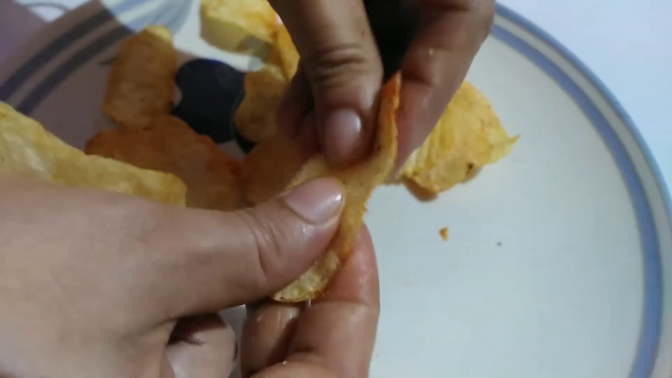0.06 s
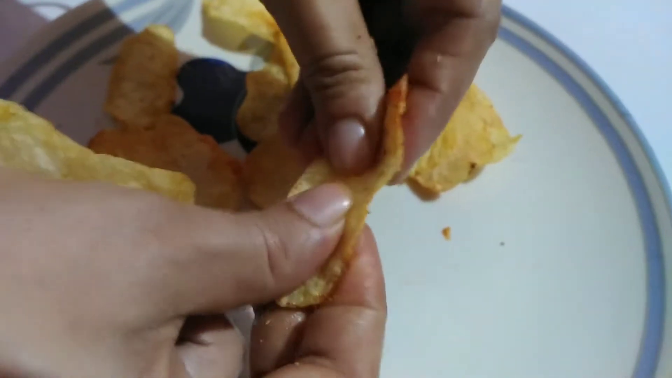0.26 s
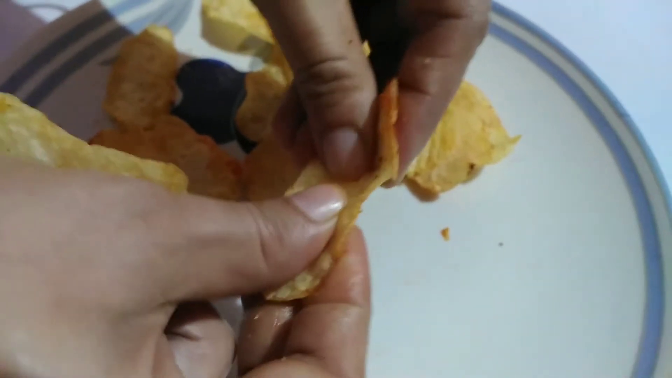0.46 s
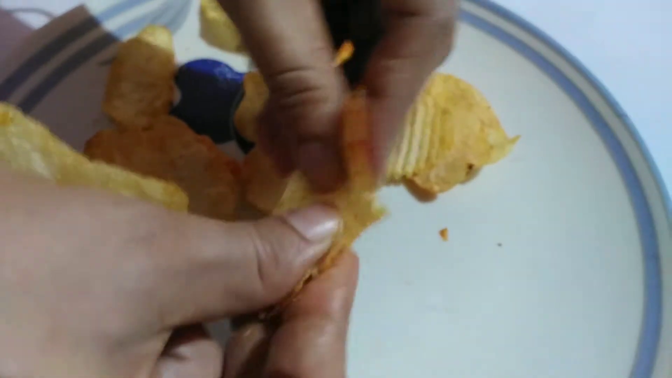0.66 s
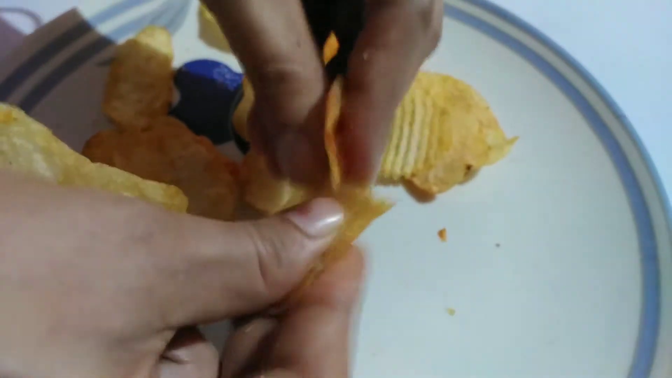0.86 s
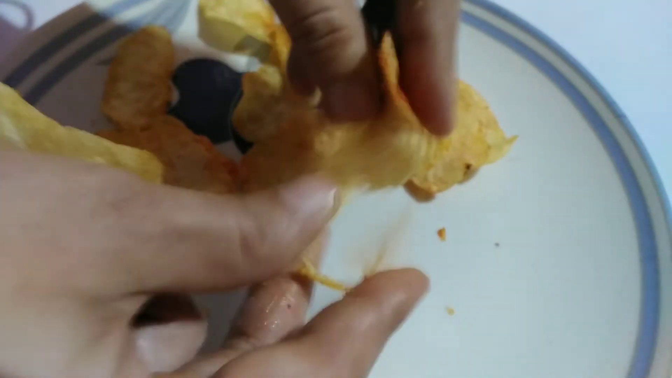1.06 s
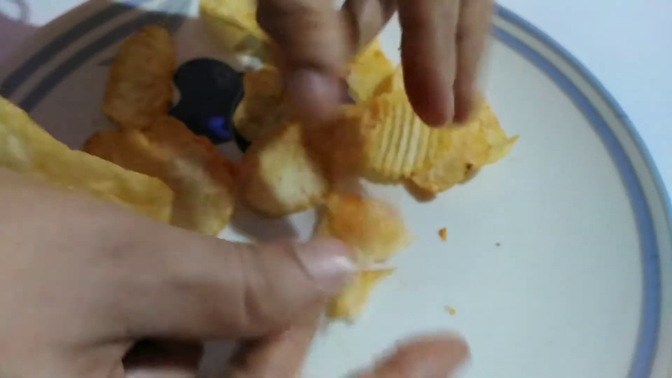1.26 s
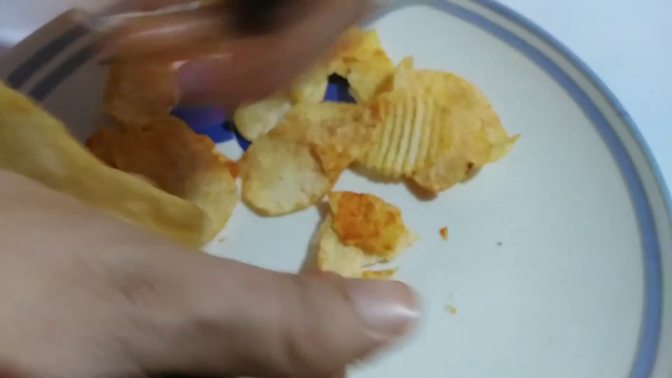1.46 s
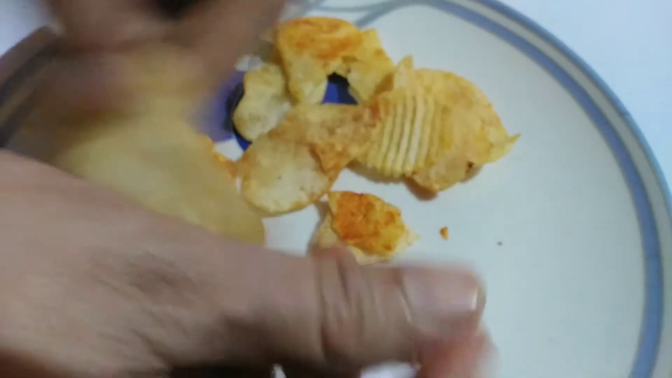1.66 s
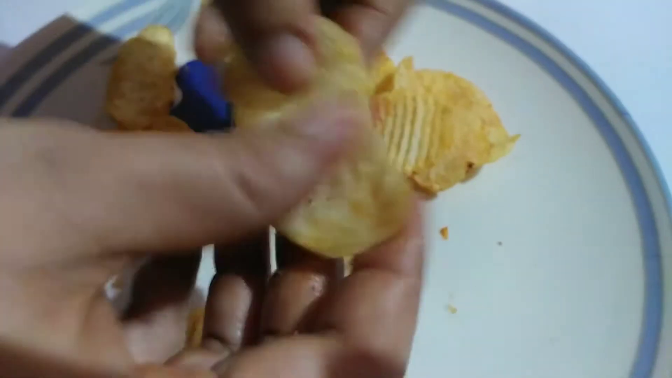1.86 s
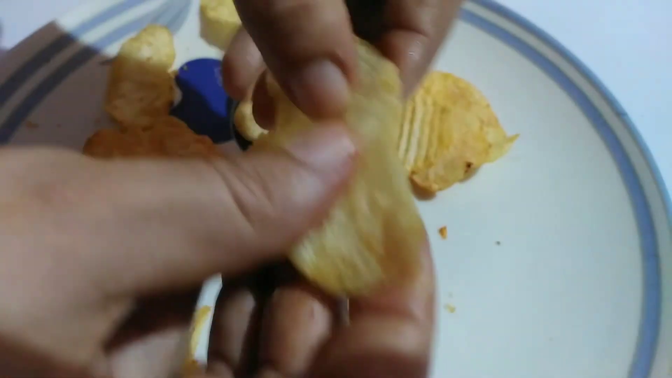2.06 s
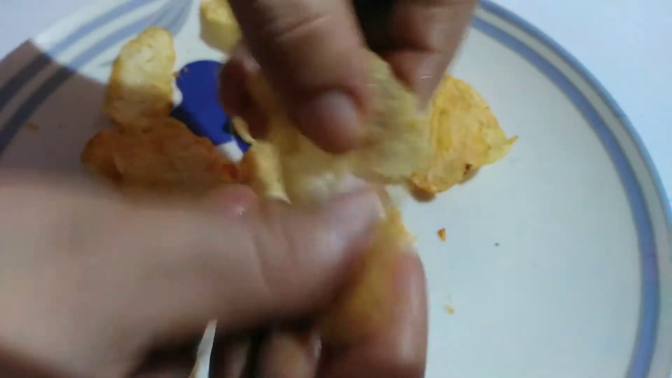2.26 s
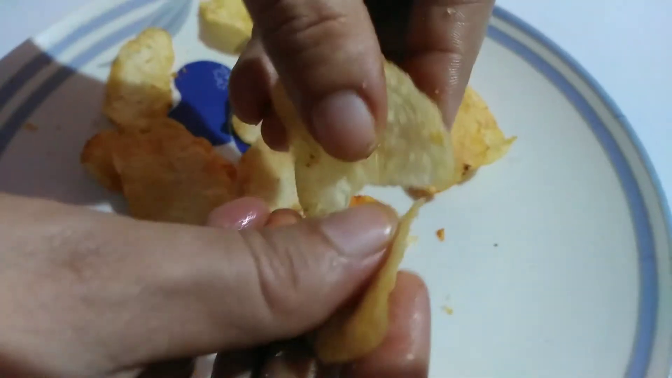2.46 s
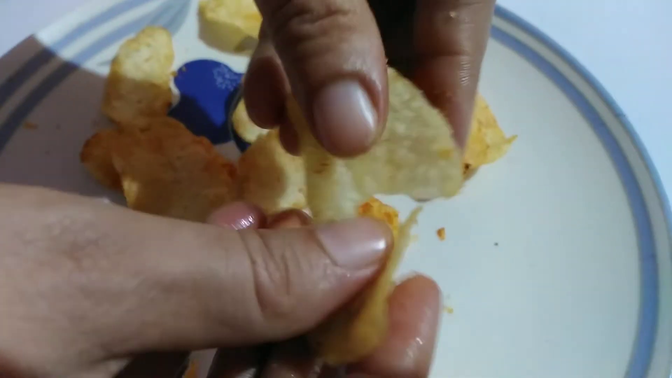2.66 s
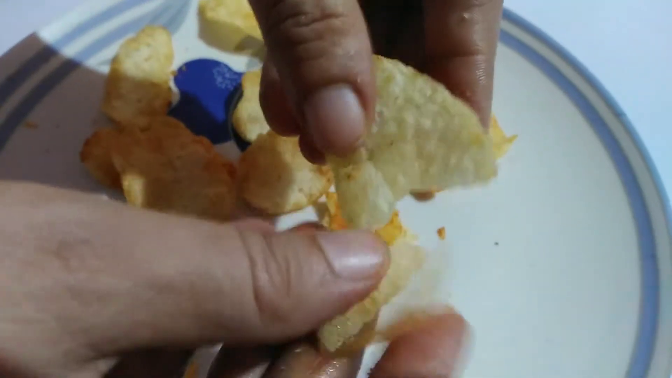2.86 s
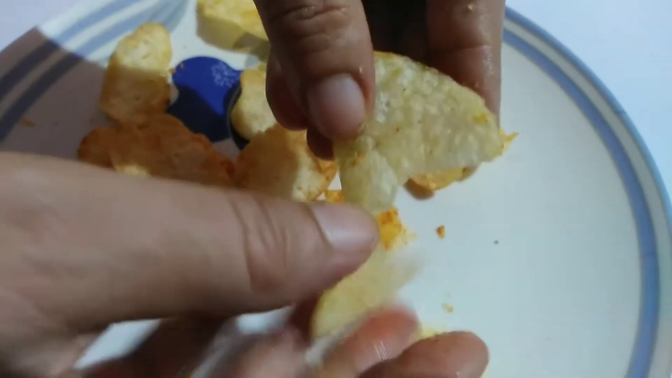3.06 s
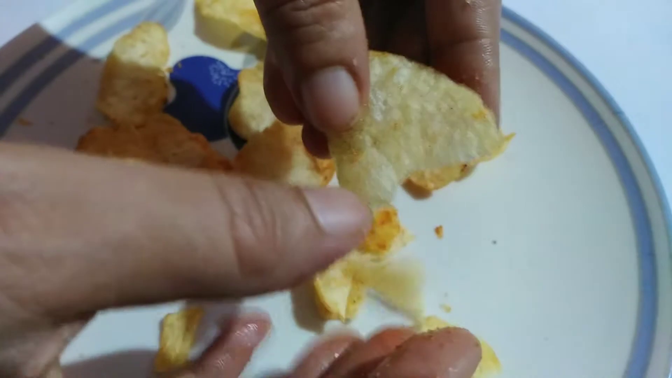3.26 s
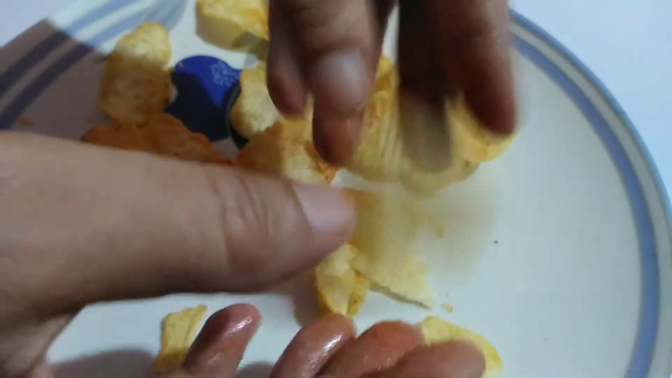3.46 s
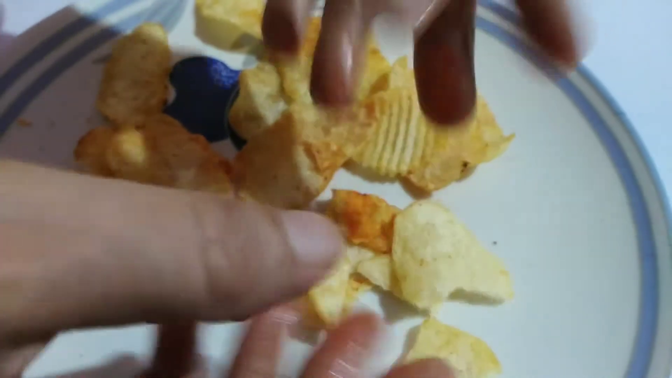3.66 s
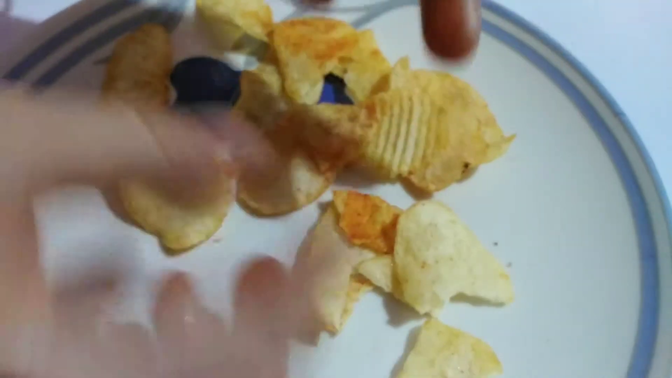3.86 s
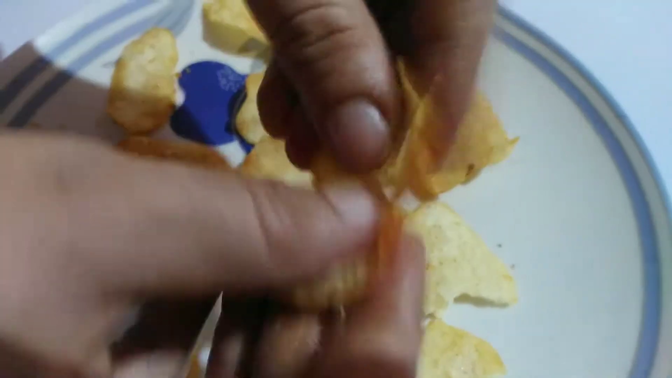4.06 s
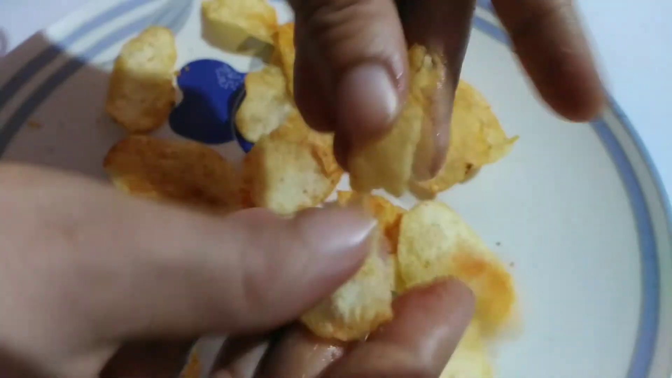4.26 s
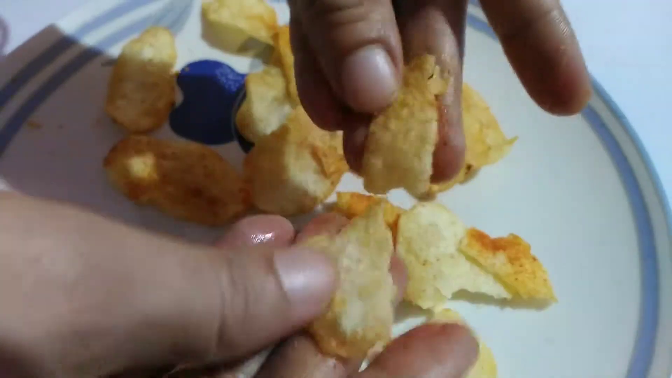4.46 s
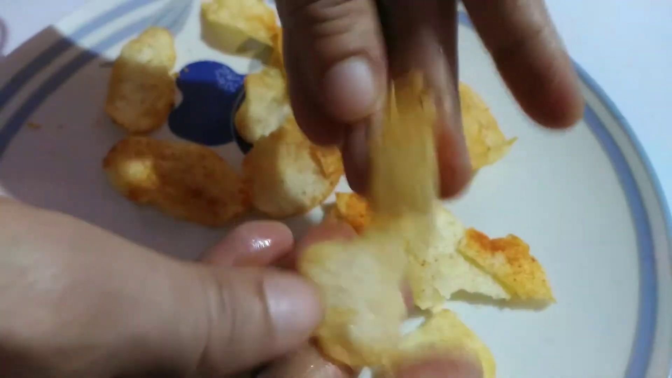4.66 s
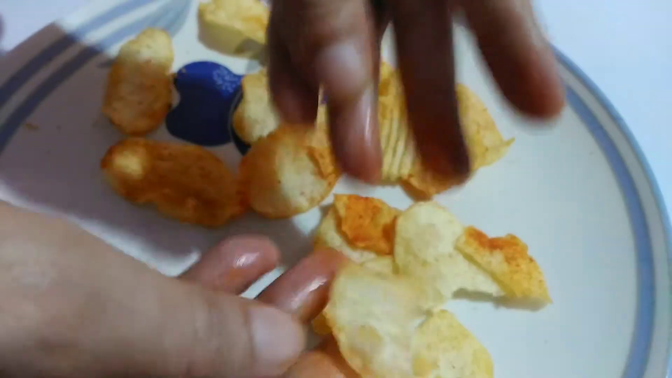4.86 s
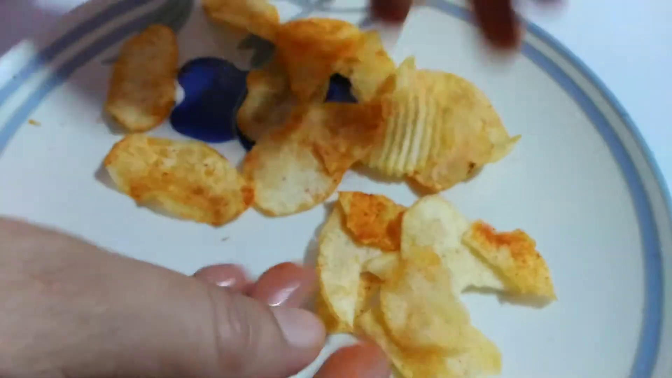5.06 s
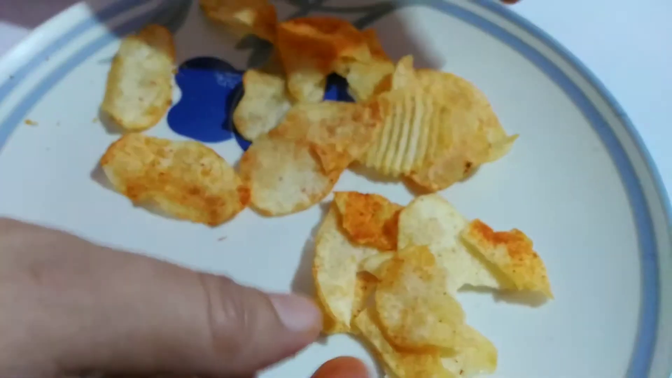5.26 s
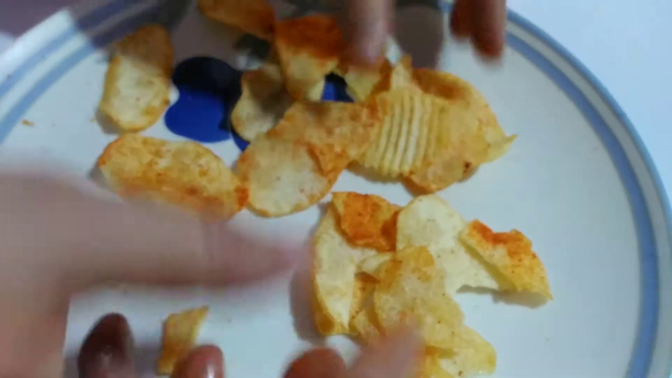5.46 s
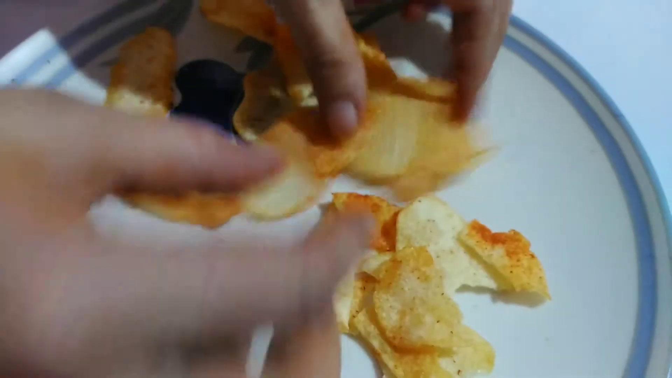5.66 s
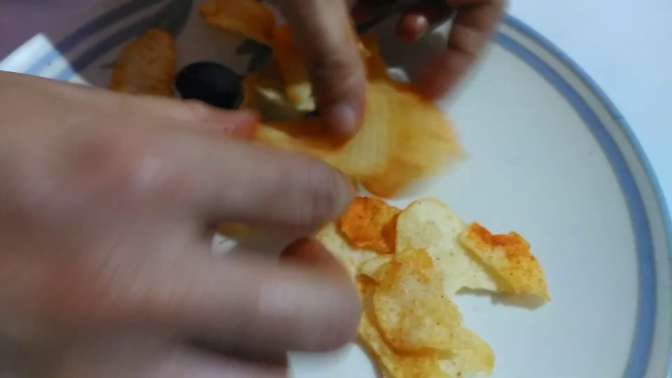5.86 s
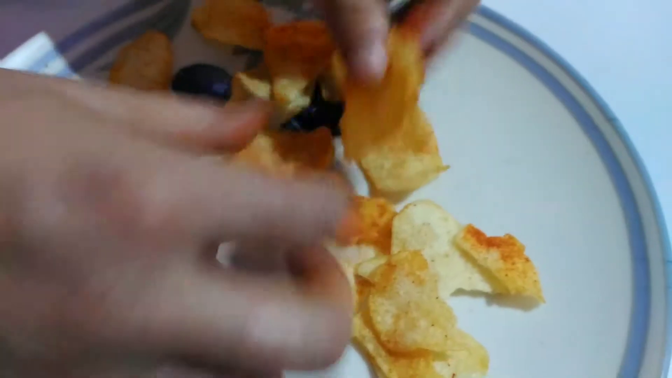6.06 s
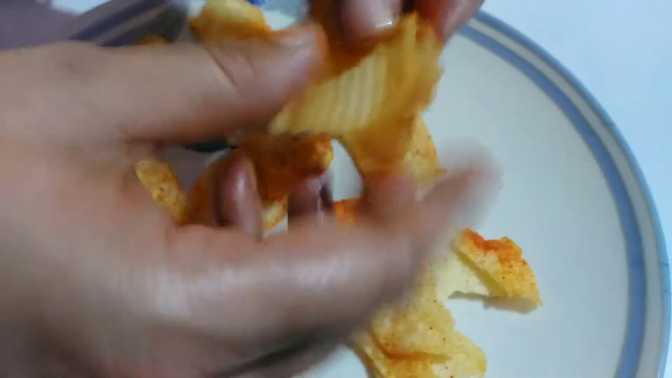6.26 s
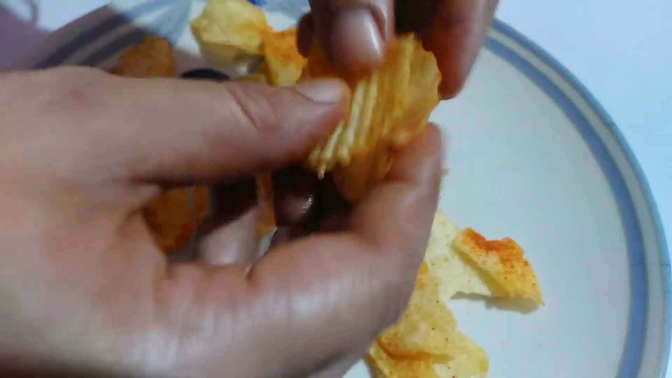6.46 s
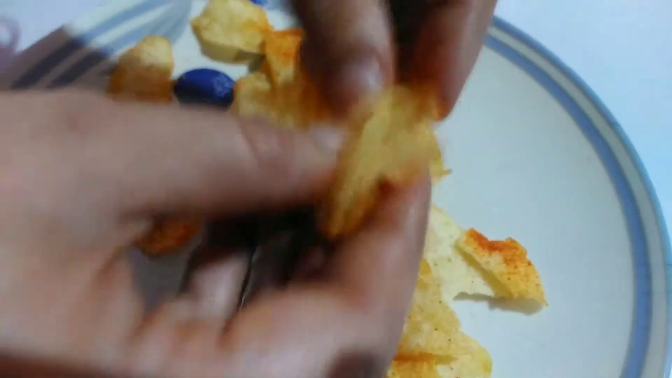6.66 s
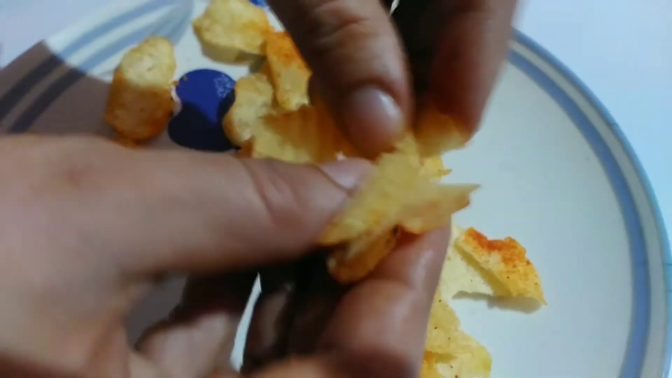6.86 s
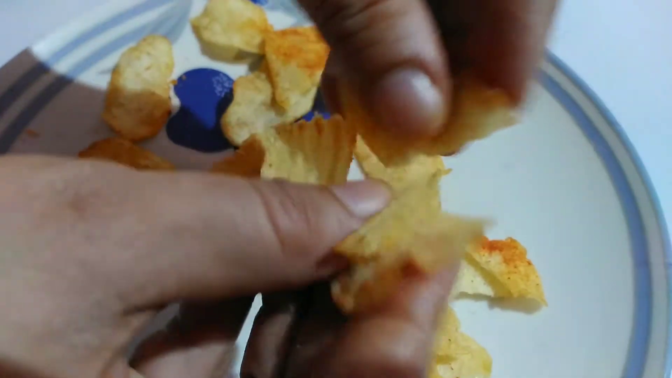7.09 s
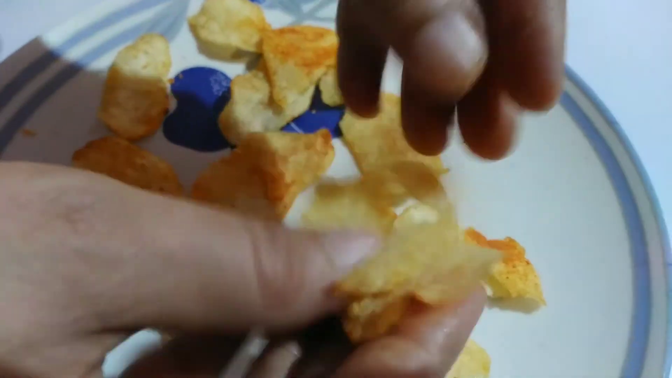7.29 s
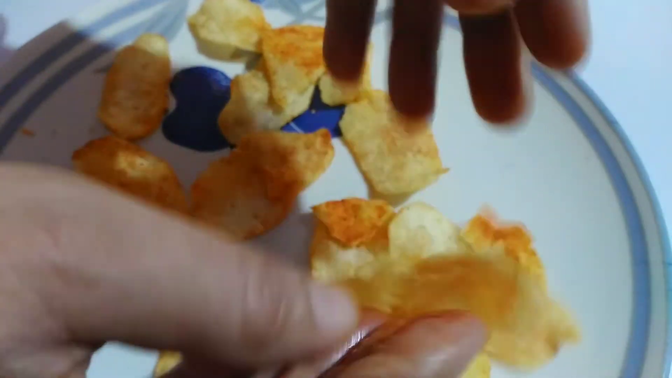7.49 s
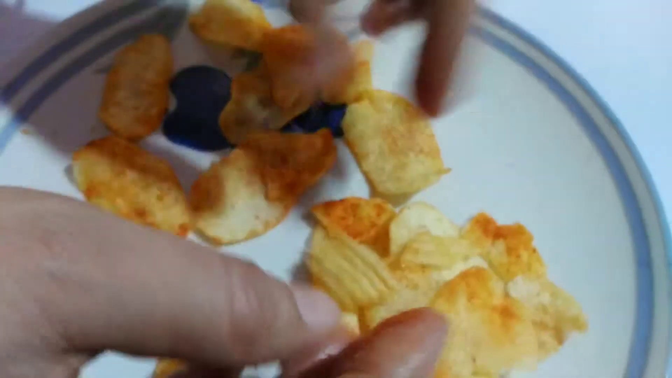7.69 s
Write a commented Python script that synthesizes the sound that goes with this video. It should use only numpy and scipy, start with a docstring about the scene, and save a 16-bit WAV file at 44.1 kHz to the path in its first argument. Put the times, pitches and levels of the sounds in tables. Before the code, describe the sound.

Very close stereo pickup of crisp chips being broken by hand over a plate in a small room. A dense crackle of dry snaps opens, then pieces drop with duller clicks. A very loud double snap follows at about two seconds, then scattered drops and rustles, handling, two more hard snaps and a final crumbly patter. Faint low appliance hum and soft air noise stay behind.

```python
"""Crisp fried chips are snapped by hand and dropped on a plate, close to a two-port phone in a small room.
Every crack is a burst of tiny fractures ringing the thin flake. Crumbs and fingers rustle as coloured
noise with grains, strewn with small chance cracks. The room answers with a short tail of dying noise bands.
Low sine bumps come through the table and faint tones from further off, over an appliance hum of tones
and narrow noise bands and a soft air noise."""
import sys
import numpy as np
from scipy import signal
from scipy.fft import rfft, irfft, next_fast_len
from scipy.io import wavfile
from scipy.ndimage import uniform_filter1d

SR = 44100
rng = np.random.default_rng(int(sys.argv[2]) if len(sys.argv) > 2 else 0)


def persist_wave(psi):
    """Save psi, clipped to +-1, as 16-bit WAV."""
    counts = np.round(np.clip(psi, -1, 1) * 32767).astype(np.int16)
    wavfile.write(sys.argv[1], SR, np.atleast_2d(counts).T)


N = 340848

# crumbs and fingers rustling: [peak t/s, level before colouring/dB, rise over 20 dB/s, fall over 20 dB/s,
# brightness/dB]; a negative fall cuts the hiss off before its peak, or leaves only the chance cracks
RUSTLES = [(0, -57, 0.0037, -0.41, -2), (.14, -54, .005, -0.44, 2.5), (0.461, -55.5, 0.003, 0.4, 9),
           (.575, -54.5, 0.0054, -0.15, -5), (0.902, -68.5, .12, .1, 6.5), (1.0, -62, .08, -0.04, 10.5),
           (1.155, -33.5, 0.0083, 0.05, -5), (1.308, -48, 0.13, 0.1, -8.5), (1.4, -56, .05, -0.08, 16.5),
           (2.196, -38.5, .01, 0.087, -4.5), (2.26, -48, .05, -0.08, 1.5), (3.05, -59.5, .03, 0.33, 3),
           (3.2, -56, .1, 0.15, -4.5), (4.265, -49.5, 0.0079, 0.22, 0.5),
           (4.76, -51.5, 0.0055, -0.24, -6.5), (5.02, -56.5, .04, 0.1, -3), (5.092, -47, .05, -0.0049, -3),
           (5.645, -54.5, 0.012, 0.34, -5), (5.697, -44.5, 0.027, -0.01, -6),
           (5.749, -43.5, .02, -0.0722, -15), (5.78, -54, 0.018, 0.28, 1.5),
           (5.877, -44, .05, 0.1562, -6.5), (6.015, -49.5, .15, 0.09, -1.5),
           (6.581, -37, 0.0055, 0.0735, 5), (6.69, -47.5, .05, 0.17, 10), (6.9, -72, .1, -0.1, 10),
           (7.24, -55.5, .03, .11, 2.5), (7.36, -56, .05, -0.4, -7), (7.471, -48.5, .03, 0.25, -3),
           (7.57, -45, .05, -0.14, -8.5), (7.62, -54, .1, -1.2, 1.5)]


def undb(db):
    """Gain of a level in dB."""
    return 10 ** (np.asarray(db) / 20)


def on_log(hz, table):
    """Read (Hz, value) rows on a log-frequency axis."""
    f, v = np.transpose(table)
    return np.interp(np.log(hz + 1), np.log(f), v)


def colour(x, gain):
    """Filter the last axis by a gain that is a function of frequency."""
    size = next_fast_len(x.shape[-1])
    hz = np.arange(size // 2 + 1) * SR / size
    return irfft(rfft(x, size) * gain(hz), size)[..., :x.shape[-1]]


def level(x, db):
    """Scale to an rms level."""
    return x * undb(db) / np.sqrt(np.mean(x ** 2))


def walk(rate):
    """Slow random wander, spread near 1, from fresh values drawn `rate` times a second."""
    k = int(SR / rate)
    steps = np.repeat(rng.standard_normal(N // k + 1), k)
    return 1.3 * uniform_filter1d(uniform_filter1d(steps, k), k)[:N]


def air():
    """Soft room noise, shared by the ports in the bass and unrelated in the treble, swelling a little."""
    # spectrum of the air before its overall level is set: [f/Hz, density/dB per Hz]
    air_colour = [(20, -20), (60, -15.5), (130, -12.5), (300, -8), (450, -16), (900, -20.5), (1500, -20.5),
                  (2500, -21), (3500, -27), (5500, -28.5), (7500, -37), (12000, -45), (16000, -45.5)]
    # side balance of the air: [f/Hz, left minus right level/dB]
    air_pan = [(60, 9), (110, 7.5), (200, 7), (380, -2.5), (700, 2.5), (1290, 0), (2380, 6.5), (4400, 9.5),
               (8120, 7.5), (15000, 3.5)]
    air_db, alike_hz = -63.5, 675
    shared, own = rng.standard_normal(N), rng.standard_normal((2, N))
    shared_power = lambda hz: .9 / (1 + (hz / alike_hz) ** 4)
    x = colour(shared, lambda hz: np.sqrt(shared_power(hz)))
    x = x + colour(own, lambda hz: np.sqrt(1 - shared_power(hz)))
    x = colour(x, lambda hz: undb(on_log(hz, air_colour) + np.outer([.5, -.5], on_log(hz, air_pan))))
    return level(x, air_db) * undb(.8 * walk(3))


def hum():
    """An appliance: a wavering tone with its multiples among narrow noise bands, the same at both ports."""
    # narrow noise bands of the appliance: [f/Hz, rms level/dB, half width at -6 dB/Hz]
    hum_bands = [(61.3, -75, 11), (91.4, -81.5, 7), (121.1, -73, 21), (177.4, -65, 6.4), (193.6, -70.5, 6),
                 (313, -82.5, 59), (383.2, -75.5, 5), (585.6, -87, 27)]
    tone_hz, tone_db = 194.5, [-60.5, -80, -77]  # levels of multiples 1, 2, 3, before their wavering
    out = 0
    for hz0, db, width_hz in hum_bands:
        band = colour(rng.standard_normal(N), lambda hz: 1 / (1 + ((hz - hz0) / width_hz) ** 2))
        out = out + level(band, db)
    phase = 2 * np.pi * tone_hz * np.arange(N) / SR + 0.13 * walk(3.1)
    for k, db in enumerate(tone_db):
        out = out + level(np.sin((k + 1) * phase), db) * undb(0.49 * walk(21.0))
    return out


def blips(table):
    """Sine bursts under a bell-shaped envelope."""
    t, out = np.arange(N) / SR, 0
    for s, db, hz, ms, pan_db in table:
        tone = np.exp(-((t - s) * 1000 / ms) ** 2) * np.sin(2 * np.pi * hz * (t - s))
        out = out + np.outer(undb([db + pan_db / 2, db - pan_db / 2]), tone)
    return out


def faint_tones():
    """Short tones from further off, each a sine that swells and fades once."""
    # distant tones: [centre t/s, envelope peak/dB, f/Hz, time from centre to 1/e/ms, left minus right level/dB]
    far_tones = [(2.825, -66.5, 3070, 20, 14.5), (2.875, -66.5, 3120, 14, 1.5), (6.03, -58, 282, 18, -3),
                 (6.26, -56, 292.5, 14.7, -1), (6.42, -58, 288.4, 115, -2.5)]
    return blips(far_tones)


def table_bumps():
    """Low bumps through the table, each a deep sine that swells and fades once."""
    # table bumps: [centre t/s, envelope peak/dB, f/Hz, time from centre to 1/e/ms, left minus right level/dB]
    bumps = [(.83, -58, 59, 47, 0), (1.165, -59.5, 57, 40, -9), (1.31, -64.5, 59, 24, 11),
             (2.235, -50.5, 60, 12, -12), (2.89, -55.5, 55, 35, -3), (3.06, -56.5, 64, 21, 0.5),
             (3.66, -62, 62, 36, 6.5), (4.395, -54, 57, 17, 1.5), (6.7, -47.5, 90, 3.4, -40.5),
             (7.05, -57.5, 60, 40, 7)]
    return blips(bumps)


def room(x, size=22050):
    """Diffuse tail: bands of noise that die at their own rate, full only after the first walls are reached."""
    # decaying bands of the room: [centre f/Hz, time to fall 60 dB/s, relative level/dB]
    room_bands = [(650, 0.1, -24.5), (1400, 0.13, -19), (2770, 0.15, -20.5), (5550, 0.22, -25.5),
                  (8700, 0.27, -20.5), (13500, 0.058, -25)]
    # bands the phone's ports favour in sound from all sides: [f/Hz, gain/dB]
    diffuse = [(1800, 1), (2400, 5), (3000, -1.6), (4500, 3), (5300, 6), (6500, 1), (7500, -2.5),
               (10000, -2)]
    wall_gap_ms, near_scatter = 11, .45  # first wall echo; share scattered earlier by plate and table
    t, tail = np.arange(size) / SR, 0
    early = np.interp(t * 1000 / wall_gap_ms, [.2, .4, .9, 1.1], [0, near_scatter, near_scatter, 1])
    # single echoes stand out at first and melt together later
    echo_levels = np.repeat(rng.standard_normal((2, size // 90)), 90, axis=1)
    patchy = undb(3 * np.exp(-t / .08) * echo_levels)
    for hz0, t60, db in room_bands:
        noise = rng.standard_normal((2, size))
        band = colour(noise, lambda hz: np.exp(-(np.log2((hz + 1) / hz0) / .5) ** 2))
        tail = tail + undb(db) * band * undb(-60 * t / t60)
    tail = tail * early * patchy / np.sqrt(0.021 * SR) * 6.2
    tail = colour(tail, lambda hz: undb(on_log(hz, diffuse)))
    return signal.fftconvolve(x, tail, axes=1)[:, :N]


def swell(t, s, db, rise_s, fall_s):
    """Level of one rustle: 20 dB up to its peak, then 20 dB down, and on at the same rates."""
    rising = (s - t) / np.maximum(rise_s, 1e-3)
    falling = (t - s) / np.maximum(fall_s, 1e-3)
    return db - 20 * np.where(t < s, rising, falling)


def rustle():
    """Grainy hiss of crumbs and sliding fingers, grainiest where quiet and smoother where loud; brightness
    blends a duller and a brighter half."""
    # fingers sliding with nothing breaking: [peak t/s, level before colouring/dB, rise over 20 dB/s,
    # fall over 20 dB/s, brightness/dB]
    slides = [(1.75, -71.5, .15, .1, 5), (1.805, -63, .06, .06, 8), (1.95, -60.5, .04, .14, 6),
              (2.6, -71.5, .3, .2, 2.5), (2.76, -72, .1, .1, 5), (2.86, -74, .1, .3, -10.5),
              (4.08, -70.5, .1, .12, 6)]
    # grains against smooth hiss, grainiest when quiet: [rustle level/dB, grain share/0-1]
    grain_share = [(-71, 1), (-57, .6)]
    grains_per_s, grain_spread_db = 700, 3.
    t = np.arange(N) / SR
    gain, low, high = np.zeros((3, N))
    for s, db, rise_s, fall_s, bright_db in RUSTLES + slides:
        a, b = (int(np.clip(v * SR, 0, N)) for v in (s - 3 * rise_s, s + 3 * fall_s))
        part = undb(swell(t[a:b], s, db, rise_s, fall_s))
        gain[a:b] += part
        low[a:b] += part * undb(-bright_db)
        high[a:b] += part * undb(bright_db)
    grain = np.clip(np.interp(20 * np.log10(gain + 1e-9), *np.transpose(grain_share)), 0, 1)
    hits = (rng.random(N) < grains_per_s / SR) * undb(grain_spread_db * rng.exponential(size=N))
    density = grain * level(uniform_filter1d(hits, 40), 0) + 1.5 - grain
    patter = density * rng.standard_normal((2, N))
    white = level(patter, 0)
    dull_colour = [(600, -19.5), (1400, -2.0), (2500, 8), (5500, 0.0), (8000, -16.5), (16000, -29.5)]
    bright_colour = [(2500, -26.0), (4000, -13.5), (6000, 3), (10000, 1.5), (16000, -9)]
    dull = colour(white, lambda hz: undb(on_log(hz, dull_colour)))
    bright = colour(white, lambda hz: undb(on_log(hz, bright_colour)))
    return uniform_filter1d(low, size=150) * dull + uniform_filter1d(high, size=150) * bright


def splinters(count=7):
    """Rows like the cracks: a few small chance cracks in each rustle, following its level and colour."""
    above_rustle_db, peak_spread_db = 12, 4
    # thud, body and sizzle re the snap at brightness 0; change per dB of brightness; scatter
    band_db, tilt, scatter_db = (-21.5, -3, -6), (0.19, -1.3, 1.1), 4
    pan_spread_db, typical_tear_ms = 5, 2.8
    s, db, rise_s, fall_s, bright_db = np.transpose(RUSTLES)[..., None]
    place, chance = rng.random((len(s), count)), rng.standard_normal((len(s), 6, count))
    at = np.clip(s - rise_s + place * (rise_s + fall_s), 0, N / SR)
    peak_db = swell(at, s, db, rise_s, fall_s) + above_rustle_db + peak_spread_db * chance[:, 0]
    colours = [band_db[k] + tilt[k] * bright_db + scatter_db * chance[:, k + 1] for k in range(3)]
    pan_db = pan_spread_db * chance[:, 4]
    tear_ms = typical_tear_ms * undb(4 * chance[:, 5])
    return np.stack([at, peak_db, *colours, pan_db, tear_ms], -1).reshape(place.size, -1)


def cracks(size=1024):
    """Each crack: fractures of uneven size over a few ms, through the resonances of that flake.
    Returns the sound at the ports and the smoother sum of all directions that fills the room."""
    # short crackling bursts: snaps, drops, small ticks and a few early echoes:
    # [t/s, short-term rms peak/dB, thud under 1.8 kHz/dB, body 2-4 kHz/dB, sizzle over 8 kHz/dB
    # (all three re the 4-8 kHz snap), left minus right level/dB, tearing time/ms]
    crack_rows = [(.0083, -23.5, -24, -13, 1, -3.5, 0.85), (.017, -33, -16, -19, 7, -5, 0.42),
                  (.062, -36, -36, -18, -11, 2, 2.4), (.1124, -37, -13, -11, 23, -12, 0.56),
                  (.1231, -30, -21, -14, 7, 11, 1.1), (.1288, -12, -23, -12.5, 6.5, -5, 0.29),
                  (.1775, -25.5, -29, -21, -2, 11, 0.88), (.1813, -17.5, -25, -2.5, 6, -4.5, 0.11),
                  (.2307, -35.5, -39, -29, -17, -4, 1.7), (.2548, -33, -32, -39, 10, -5, 0.32),
                  (.283, -12.5, -26, 2, -12.5, -0.5, 0.37), (.3316, -23, -22.5, 1, 3, -2, 1.35),
                  (.3542, -33.5, -31, -32, -2, 16, .79), (.396, -27.5, -30, -6, -11, -13.5, 1.5),
                  (.412, -28.5, -29, -14, 7, 12, 0.74), (.4534, -12, -16, -5.5, -5, -5, 0.76),
                  (.4649, -39, -22, -8, 6, 6, 1.8), (.4773, -24, -37, -24, -7, -7, 4.1),
                  (.484, -20, -42, -22, -7, -3, 2.3), (.53, -30.5, -31, -2, -1, 0, 2),
                  (.562, -16.5, -66, -26, -15, -3, 1.3), (.5899, -18, -42, -8, 0, -5, 0.66),
                  (.6059, -8, -38, -21.5, -19, -6.5, 0.27), (.618, -18, -22.5, -15, 7, -4, 2.6),
                  (.6433, -33, -23, -18, 2, -1, 0.69), (.6519, -17, -42, -24, -10, -3, 0.17),
                  (.6664, -18.5, -23, -1.5, -1, -3, 2.1), (.6793, -37, -5, -15, -3, -8, 3.3),
                  (.711, -33, -13, -24, 4, -1, 1.4), (.7414, -29, -17, -13, 5.5, -2, 1.04),
                  (.8064, -44, -10, -15, 9, 1, .5), (.849, -48, -6, -12, 9, -5, 0.74),
                  (.8636, -46, -17, -25, -2, -15, 0.67), (.8848, -36, -24, -42, 1.5, -1, .44),
                  (.907, -34.5, -22, -21, 27, 1, 0.39), (.9325, -42, -21, -29, 9.5, -3, 2.3),
                  (.9836, -34, -15, -31, 8, 3, 0.3), (1.1568, -16.5, -20.5, 10.5, -26.5, 6, 1.8),
                  (1.1967, -32, -17, 21, -12, 10, 2.4), (1.2527, -32, -16, -3, -11, 0, 2.1),
                  (1.2617, -23.5, -4, 31, -19, 5, 2), (1.2707, -26, -9, 11, -18, 1, 4.9),
                  (1.2781, -22.5, -11, 18, -9, -8, 4.7), (1.2957, -22, -11, 10, -11, 3, 9.1),
                  (1.314, -18, -26.5, -6.5, -16, -3.5, 1.94), (1.3732, -27.5, -33, -20, -1, 1, 1.5),
                  (1.3858, -31.5, -43, -8.5, -3.5, -0.5, 5.4), (2.181, -29.5, -24.5, -13.5, 15, 2.5, 0.46),
                  (2.1944, -7.5, -31, -5, -15, -2, 0.85), (2.2011, -4.5, -22.5, -20, -11, -3.5, 1.7),
                  (2.2223, -10.5, -14.5, -5, -1.5, 3.5, 2), (2.243, -21, -20, -1, -12, -13, 1.7),
                  (2.3135, -32.5, -30, -18, -7, -2, 2.3), (2.3461, -36, -18, -14, 5, -0.5, 0.8),
                  (2.5081, -42.5, -8.5, 3, -7, -9, 1.07), (2.5475, -33.5, -26, -37.5, -2.5, 2, 0.36),
                  (2.5879, -44, -25, -29, -17, -13.5, 1.9), (2.6206, -48, -14.5, -8.5, 6.5, -4, 0.81),
                  (2.7684, -52, -18, -11, 0, -6.5, 1.04), (3.0234, -15.5, -8.5, 12.5, -21.5, -2.5, 2.33),
                  (3.0337, -20, -16, -7.5, -22.5, -5.5, 3.3), (3.0566, -23, -12, 4.5, -10.5, -2, 4.5),
                  (3.124, -29, -19, -3, -2.5, 5, 1.7), (3.172, -39, -32, -13, -13, 7, 1.3),
                  (3.2059, -16.5, -29.5, 3.5, -13.5, 0, 2.54), (3.2575, -40, -18, -10, 3, 17, 0.92),
                  (3.3302, -28, -22.5, 2.5, -14.5, 2.5, 3.1), (3.516, -23, -12, 8, -12.5, 3.5, 3.1),
                  (3.5341, -18, -7.5, 12, -6, -0.5, 3.1), (3.566, -34.5, -3, -1, -8, 3, 7.4),
                  (3.5894, -10, -20.5, 2, -25, -3, 1.67), (3.6445, -25, -23, 13, -10, 1, 2.2),
                  (3.6596, -33, -33.5, 9, -13, -1, 3.3), (4.0696, -46, -15, -19, 5, -6.5, 0.29),
                  (4.247, -29.5, -6.5, 14, -0.5, 0, 3.8), (4.2769, -30.5, -18.5, 1, -12, -3, 3.6),
                  (4.2913, -19, -41, -11.5, -20, -2, 2.1), (4.3414, -34.5, -28, -11, -19, 4, 4),
                  (4.36, -21.5, -39.5, 1, -3, 2.5, 2.4), (4.4037, -30, -32, -4.5, -15, 4, 3.6),
                  (4.7569, -34.5, -19.5, 3, -12, -2.5, 3.5), (4.778, -37.5, -18.5, -1, -11.5, -0.5, 3.4),
                  (4.8005, -40, -25, -15, 0, -1, 1), (4.8108, -36.5, -21, -15, 0, -4, .5),
                  (5.035, -29.5, -31, 5.5, -3.5, -1.5, 1.23), (5.0784, -29, -16, 13, -25, -2, 4.8),
                  (5.104, -31.5, -25.5, 0.5, -18, 4, 2.08), (5.7263, -26, -5.5, 24.5, -9, 0, 1.6),
                  (5.7502, -34, -9, 7, -9, -11, 2.1), (5.781, -31, -26, -10, -5, -9, 1.9),
                  (5.865, -16.5, -4, 14.5, -15, -4, 3), (5.9064, -35, -1, 21, -10, 10, 3.3),
                  (5.9315, -35, 15, 15, -17, -9, 3.5), (5.9421, -13, -7, 16.5, -4, 5, 2.74),
                  (6.0238, -22, -1, 9, -20, 2, 3.2), (6.047, -26, -13, 4.5, -25, 7.5, 1.47),
                  (6.509, -45.5, -18.5, -19, -2, -4, .7), (6.5421, -31.5, -44, -23.5, -3, -9.5, .56),
                  (6.5807, -8, -19.5, -9.5, -4, -5, 1.5), (6.592, -33, -24, -30, -5, 3, 2.5),
                  (6.6698, -23.5, -23, -14, 5, -2, .55), (6.6892, -5, -14.5, -16, -10, -0.5, 2.2),
                  (6.7167, -30, -51, -9, -23, 12, 2.5), (6.813, -30.5, -34, -20, 18, -4, 1.7),
                  (6.83, -38, -26.5, -15.5, 0, -2, 2.1), (6.9085, -39, -23.5, -30.5, 5, -6.5, 1.5),
                  (6.9983, -42.5, -20.5, -10.5, 13.5, -19, 0.91), (7.1241, -29, -20.5, -24.5, 18, 1.5, 0.9),
                  (7.2267, -37.5, -4, -4, 8.5, -7.5, 3.3), (7.2807, -43, -16, -13, -4, -11.5, 2.6),
                  (7.352, -31.5, -24, 3, -12, -1, 4.1), (7.3911, -33, -24, -1, -34, 0, 2.7),
                  (7.4008, -33.5, -35.5, -6, -19, -4, 0.87), (7.443, -32, -22, -1, -10, 4, 2.1),
                  (7.4517, -19.5, -28.5, 3, -19, 3.5, 2.3), (7.4636, -28.5, -18, -1, -10, 0, 1.15),
                  (7.477, -32.5, -16, -5, -14, 0, 4.4), (7.4977, -35, -26, -2, -3, 0, 1.9),
                  (7.5369, -25.5, -45, -3.5, -16, 3, 1.75), (7.5485, -25.5, -24, -1, -8, 3, 0.88),
                  (7.57, -31, -16, -4, -10.5, -1, 4.3), (7.58, -33, -16, -1, -10, -1, 4),
                  (7.5934, -34, -23, -1, -6, -3, 3.8), (7.603, -36, -33, 9, -4, 0, 3.8)]
    # colour points of a burst, one row: [sub, foot, thud, body, snap, sizzle, top f/Hz]
    crack_hz = [200, 600, 1200, 2700, 5600, 11500, 16000]
    foot_db, top_db = -11, -6.5  # foot below the thud, top below the sizzle
    ripple_db, mode_hz = 5, 850  # depth and width of each flake's own resonances
    left_lag_ms, lag_spread_ms, alike = .3, .15, 0.94  # alike: correlation of the two ports' noise
    s, peak_db, thud_db, body_db, sizzle_db, pan_db, tear_ms = np.r_[crack_rows, splinters()].T
    t, hz = np.arange(size) / SR, np.arange(size // 2 + 1) * SR / size
    chance = rng.standard_normal((len(s), 7, size))

    # the fractures crowd together about one tearing time after the start
    tear = np.clip(tear_ms, .2, 8)[:, None] / 1000
    shape = (t / tear) ** 2 * np.exp(-t / (0.49 * tear)) * undb(3.25 * chance[:, 0])
    right = alike * chance[:, 1] + np.sqrt(1 - alike ** 2) * chance[:, 2]
    noise = np.stack([chance[:, 1], right, chance[:, 6]])  # left, right, all directions
    spec = rfft(noise * shape)
    # the broad colour comes from the flake, not from the order of the fractures
    spec[:2] /= np.sqrt(uniform_filter1d(abs(spec[:2]) ** 2, size=24, axis=2))
    spec[2] *= np.sqrt(np.mean(abs(spec[2]) ** 2, 1))[:, None] / (abs(spec[2]) + 1e-9)

    # levels are per band, so each octave up gets 3 dB less per Hz
    knots = np.stack([thud_db + 3 * foot_db, thud_db + foot_db, thud_db, body_db - 3, 0 * s - 6,
                      sizzle_db - 9, sizzle_db - 9 + top_db], 1)
    db = np.array([on_log(hz, np.c_[crack_hz, k]) for k in knots])
    bins = max(int(mode_hz * size / SR), 1)
    ripple = uniform_filter1d(chance[:, 3:6, :len(hz)], bins, axis=2) * np.sqrt(bins) * ripple_db
    ripple[:, 2] = 0  # resonances smooth out over all directions
    # fold the cepstrum so that the flake rings after the fracture, never before
    ceps = irfft((db + ripple.transpose(1, 0, 2)) * np.log(10) / 20, size)
    ceps[..., 1:size // 2] *= 2
    ceps[..., size // 2 + 1:] = 0
    burst = irfft(spec * np.exp(rfft(ceps)), size)

    # match the ports' energy to the sum of directions, then set the peak of a 50-sample rms
    burst[:2] *= np.sqrt((burst[2] ** 2).sum(1) / (burst[:2] ** 2).sum(2))[..., None]
    power = uniform_filter1d((burst[:2] ** 2).mean(0), 50, axis=1)
    burst *= (undb(peak_db) / np.sqrt(power.max(1)))[:, None]

    lag = np.outer([1, 0, 0], left_lag_ms + lag_spread_ms * chance[:, 5, -1]) / 1000
    out = np.zeros((3, N + 2 * size))
    for ch, side in enumerate((1, -1, 0)):
        at = np.maximum(((s + lag[ch]) * SR).astype(int), 0)[:, None] + np.arange(size)
        np.add.at(out[ch], at, burst[ch] * undb(side * pan_db / 2)[:, None])
    return out[:2, :N], out[2:, :N]


def scene():
    """Hands and chips near the ports, their tail in the room, and the background."""
    # side balance of the phone's ports for the near sounds and their tail: [f/Hz, left minus right level/dB]
    ports = [(300, -4), (700, 1.5), (1300, -7), (2400, -5), (4400, 6.5), (8000, 2.5), (14000, 0)]
    bursts, spread = cracks()
    crumbs = rustle()
    chips = bursts + crumbs + room(spread + crumbs)
    near = colour(chips, lambda hz: undb(np.outer([.5, -.5], on_log(hz, ports))))
    return near + table_bumps() + faint_tones() + hum() + air()


def record(dry):
    """The phone rounds the loudest bursts, bending peaks above 0.5 towards 0.9, and cuts the top."""
    top_hz = 15700
    loud = np.clip(abs(dry) - .5, 0, None)
    soft = dry - np.sign(dry) * (loud - .4 * np.tanh(loud / .4))
    return signal.sosfilt(signal.ellip(10, .2, 90, top_hz, fs=SR, output="sos"), soft)


dry = scene()
out = record(dry)
persist_wave(out)
```